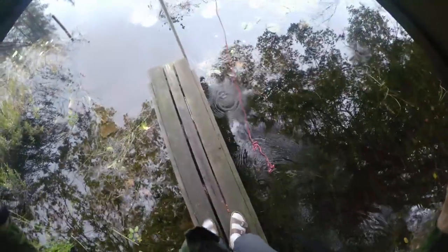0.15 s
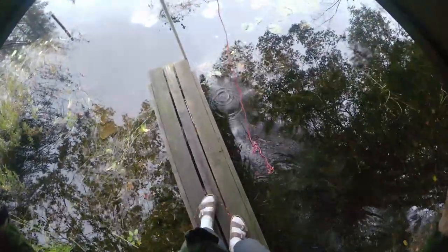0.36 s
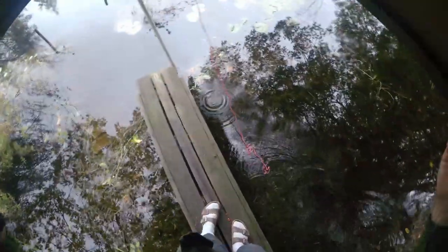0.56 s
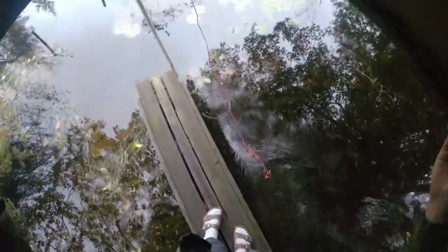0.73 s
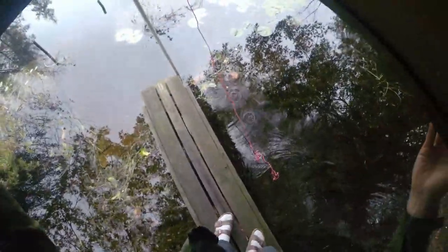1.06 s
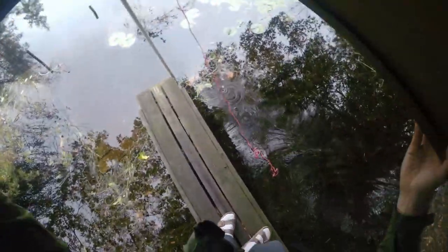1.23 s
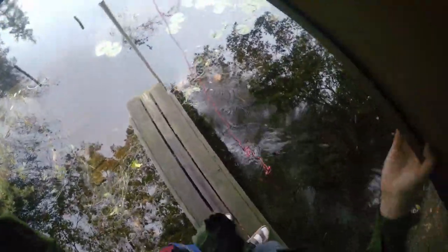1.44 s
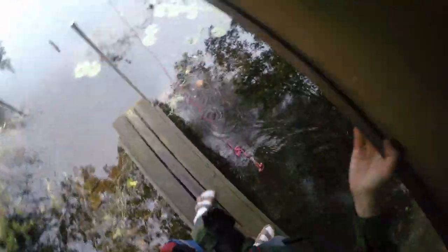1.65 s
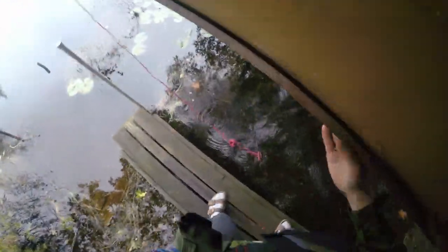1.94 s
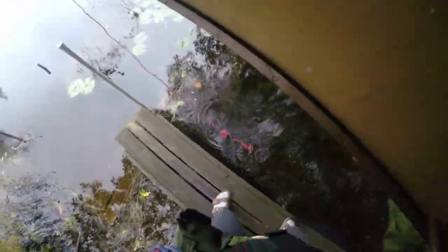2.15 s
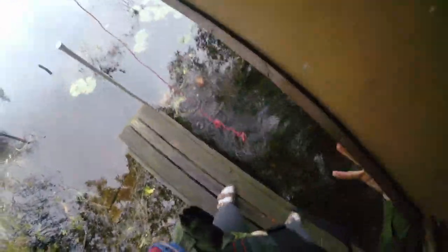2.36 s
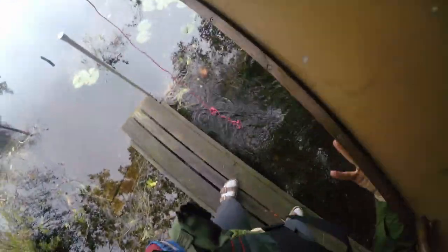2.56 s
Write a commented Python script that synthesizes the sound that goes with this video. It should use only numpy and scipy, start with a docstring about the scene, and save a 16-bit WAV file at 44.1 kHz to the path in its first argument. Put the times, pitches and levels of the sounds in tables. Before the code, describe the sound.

A canoe hull dragged and bumped by hand, with hollow knocks, short rubbing groans and deep thumps

```python
"""An upturned canoe is shifted by hand, over a low rumble, a cloth hiss and a faint air noise.
The hull drags throughout and small fittings tick; both are filtered or modal noise.
From 0.4 s slips give snaps with hollow tones; near 0.6 s the lowest hull mode starts to sing.
At 1 s one sharp rap with a clatter leads into soft thumps that ring the hull modes and panels.
Scuffs (shaped grit) and groans (jittered harmonics) follow from 1.3 s; the deepest thumps come after 2 s."""
import sys
import numpy as np
from scipy import signal
from scipy.io import wavfile
from scipy.ndimage import uniform_filter1d

SR = 44100
rng = np.random.default_rng(int(sys.argv[2]) if len(sys.argv) > 2 else 0)


def transcribe(u):
    """Save the signal u as a 16-bit wav file named by the first command-line argument.

    u: samples, shape (n,) or (channels, n), limited to [-1, 1]; the rate is SR.
    q: integer samples, one column per channel.
    """
    v = np.clip(np.atleast_2d(u).T, -1, 1)
    q = np.round(v * 32767).astype(np.int16)
    wavfile.write(sys.argv[1], SR, q)


N = 119070  # samples

# Colours are filter gains. Balance is left minus right. Event levels are relative within their table.
# air noise colour: (frequency [Hz], gain [dB])
AIR_COLOUR = [(265, -1), (450, -11.5), (900, -12), (5000, -24.5), (8000, -59), (14000, -39)]
# rumble course: (time [s], level [dB])
RUMBLE_COURSE = [(0, -28.5), (.17, -28), (.65, -25.5), (1.25, -24), (1.55, -21.5), (1.72, -17), (1.88, -17),
                 (2.001, -25), (2.13, -18), (2.53, -20.5), (2.7, -31.5)]
# rumble colour: (frequency [Hz], gain [dB])
RUMBLE_GAINS = [(18, -3.5), (31, 7), (42, -3.5), (75, -13), (130, -32), (300, -41), (800, -96)]
# sleeve hiss course: (time [s], level [dB])
SLEEVE_COURSE = [(.2, -53), (.7, -48), (1.15, -49), (1.4, -45), (1.65, -42.5), (1.9, -45), (2.05, -42.5),
                 (2.18, -43.5), (2.35, -46.5), (2.5, -51)]
# cloth colour, also the treble of the scuffs: (frequency [Hz], gain [dB])
CLOTH_COLOUR = [(200, -3.5), (800, 8.5), (3000, -1), (4800, -5), (6600, 3), (8500, -1), (12500, -16),
                (15000, -39)]
# hull modes: (frequency [Hz], level [dB], T60 [s])
HULL_MODES = [(104.05, 4.5, 0.43), (128, -0.5, 0.44), (163.5, -4, 0.58), (188, 5, 0.21), (237.9, 2, 0.17),
              (285, -14, 0.15), (400, -7, 0.34), (455, -2, 0.13), (535, -0.5, 0.19), (606, -14, 0.3),
              (793, -6, 0.25)]
# dense panel ringing: (frequency [Hz], gain [dB])
PANEL_COLOUR = [(40, -8), (100, 7.5), (160, 7), (280, 2.5), (720, -9), (1000, -24), (5000, -38)]
# hull drag course: (time [s], level [dB])
DRAG_COURSE = [(0, -41.5), (.55, -44.5), (.68, -29), (.9, -27.5), (1.25, -29), (1.48, -23), (1.57, -35.5),
               (1.9, -36.5), (2.08, -23), (2.2, -39), (2.48, -30.5), (2.58, -41)]
# friction force colour: (frequency [Hz], gain [dB])
FRICTION_COLOUR = [(50, 0.5), (110, 10), (200, -6.0), (400, -4.0), (1000, -11.0), (3000, -10)]
# hard ticks: (time [s], level [dB], balance [dB], ring frequency [Hz])
TICK_EVENTS = [(0.0189, -18.5, 1, 7150), (0.438, -30, -10, 8140), (0.4678, -35, -12, 7800),
               (1.414, -25, 6, 6700), (2.264, -21.5, 0, 6350)]
# tick colour: (multiple of ring frequency [1], gain [dB])
TICK_COLOUR = [(.15, -30), (.5, -12.5), (1, 7.5), (1.25, -2.5), (2, -30)]
# hull slips: (time [s], snap level [dB], hollow answer level [dB])
KNOCK_EVENTS = [(0.4362, -23, -28.5), (.467, -20.5, -21.5), (0.672, -28.5, -20.5), (0.725, -22.5, -16.5),
                (0.7612, -23, -17.5), (0.793, -24, -15), (0.8196, -23, -15.5), (0.8377, -25.5, -16),
                (0.8588, -23, -17), (0.8889, -28, -15.5), (.988, -34, -21.5), (1.976, -24.5, -33)]
# snap colour: (frequency [Hz], gain [dB])
SNAP_COLOUR = [(200, 4.5), (600, -0.5), (1750, -1.5), (2100, -9.5), (4200, -18), (8000, -19), (13000, -48)]
# hollow answer tones: (frequency [Hz], level [dB], balance [dB])
ANSWER_TONES = [(376, -10.5, 11), (455, -2, 8), (609, -7.5, -3.5), (736, -11.5, 8), (897, -9.5, 0.5),
                (1016, -16.5, 4), (1176, -14, -1), (1666, -21, -9.5)]
# hull singing course, silent outside it: (time [s], level [dB])
HUM_COURSE = [(.62, -42), (.8, -30), (1.05, -30), (1.2, -44)]
# rap colour: (frequency [Hz], gain [dB])
RAP_COLOUR = [(200, 12.5), (750, 0.5), (1100, 5), (2400, -2), (5000, -28.5), (8300, -12), (13000, -47)]
# soft blows: (time [s], level [dB], contact corner [Hz], swell time constant [s])
THUMP_EVENTS = [(1.044, -9, 131, 0.0028), (1.674, -14, 327, .004), (2.058, -3, 91, 0.018),
                (2.247, -2, 685, 0.0013), (2.254, -3, 442, 0.0011), (2.266, 4, 173, 0.0019),
                (2.283, -2.5, 184, 0.006), (2.319, 1.5, 109, 0.014), (2.397, -10, 89, 0.058)]
# scuffs: (time [s], rise [s], decay time constant [s], body level [dB], treble level [dB])
SCUFF_EVENTS = [(1.263, 0.038, 0.022, -27, -39), (1.444, 0.013, 0.022, -51, -38.5),
                (1.664, 0.013, 0.012, -67, -39.5), (1.99, 0.02, 0.079, -34.5, -43.5),
                (2.06, 0.015, 0.015, -30.5, -54), (2.25, 0.008, 0.024, -32, -39.5),
                (2.326, 0.016, 0.013, -72, -40.5), (2.646, 0.0019, 0.014, -65, -38.5)]
# scuff body and clatter colour: (frequency [Hz], gain [dB])
SCUFF_COLOUR = [(120, 0), (500, 4.5), (1000, -10.5), (2500, -15), (4500, -26), (9000, -40)]
# stick-slip groans: (start [s], length [s], level [dB], mean pitch [Hz])
GROAN_EVENTS = [(1.268, 0.09, -39.5, 569), (1.275, 0.076, -40, 429.5), (1.335, 0.054, -38.5, 477),
                (1.386, 0.16, -40, 455), (1.555, 0.069, -37, 241.3)]
# treble balance of the microphone ports: (frequency [Hz], balance [dB])
PORT_BALANCE = [(2500, -1.5), (6300, 3), (9500, -6), (12000, 0)]

AIR_DB = -47
ANSWER_PEAK_S, ANSWER_TAIL_DB, ANSWER_T60_S = 0.0088, -17, 0.35
RAP_S, RAP_DB, RAP_DECAY_S = 1.041, -23, 0.005
CLATTER_DB, CLATTER_HOLD_S, CLATTER_DECAY_S = -29.5, 0.024, 0.01
THUMP_T60_S, THUMP_RING_DB = 0.15, -4
EDGE_HZ = 14800


def amp(db):
    """Converts dB to an amplitude factor."""
    return 10 ** (np.asarray(db) / 20)


def unit(x):
    """Scales to rms 1."""
    return x / np.sqrt(np.mean(x ** 2) + 1e-20)


def blow(x):
    """Scales to the energy of 10 ms at rms 1."""
    return x / np.sqrt(np.mean(x ** 2) * x.shape[-1] / SR * 100 + 1e-20)


def add(mix, start_s, sound):
    """Adds a sound to the mix in place, cut at the end."""
    part = mix[:, max(round(start_s * SR), 0):][:, :sound.shape[1]]
    part += sound[:, :part.shape[1]]


def pan(balance_db):
    """Gives left and right gains; positive is heavier on the left."""
    return amp([[balance_db / 2], [-balance_db / 2]])


def course(points):
    """Interpolates a (time [s], level [dB]) table in dB, end values held, into a gain."""
    return amp(np.interp(np.arange(N) / SR, *np.transpose(points)))


def noise(n, correlation):
    """Two channels of white noise with the given correlation."""
    a, b = rng.standard_normal((2, n))
    c = np.clip(correlation, -1, 1)
    return np.array([a, c * a + np.sqrt(1 - c * c) * b])


def colour(x, points, size=8192):
    """Minimum-phase filter through (frequency [Hz], gain [dB]) points."""
    f, db = np.transpose(points)
    hz = abs(np.fft.fftfreq(size, 1 / SR))
    log_gain = np.log(amp(np.interp(np.log(hz + 1), np.log(f + 1), db)))
    spectrum = np.exp(np.conj(signal.hilbert(log_gain)))
    taps = np.fft.ifft(spectrum).real[:size // 2]
    return signal.fftconvolve(x, taps[None], axes=1)[:, :x.shape[1]]


def grain(n, rate_hz, depth_db):
    """A randomly flickering gain."""
    knots = rng.standard_normal(n)
    return amp(depth_db * np.interp(np.arange(n) * rate_hz / SR, np.arange(n), knots))


def steady(x, window_s):
    """Evens out the swells of a noise by its twice-smoothed power."""
    size = int(window_s * SR)
    power = uniform_filter1d((x ** 2).mean(0), size=size)
    return x / np.sqrt(abs(uniform_filter1d(power, size=size)) + 1e-20)


def ring(force):
    """Rings the hull modes, decaying sines, with a force."""
    t = np.arange(SR // 2) / SR
    modes = sum(amp(db - 60 * t / t60) * np.sin(2 * np.pi * hz * t) for hz, db, t60 in HULL_MODES)
    return signal.fftconvolve(force, modes[None], axes=1)[:, :force.shape[1]]


def air():
    """Constant faint coloured noise."""
    return amp(AIR_DB) * unit(colour(noise(N, 0.15), AIR_COLOUR))


def rumble():
    """Lumpy air and handling rumble: low noise, heavier on the right."""
    lumps = colour(noise(N + SR, 0.8), RUMBLE_GAINS)
    lumps = steady(lumps, window_s=0.22)[:, SR:]  # drops the filter's run-in
    return course(RUMBLE_COURSE) * lumps * pan(-9)


def sleeve():
    """Cloth hiss: noise with fast and slow grain, rising and falling along its course."""
    fibres = noise(N, -0.19) * grain(N, rate_hz=1700, depth_db=1.0) * grain(N, rate_hz=39, depth_db=2.5)
    return course(SLEEVE_COURSE) * unit(colour(fibres, CLOTH_COLOUR))


def drag(panel_db=-4):
    """Friction noise keeps the hull modes and panels droning."""
    force = colour(noise(N, 0.93), FRICTION_COLOUR)
    drone = unit(ring(force)) + amp(panel_db) * unit(colour(force, PANEL_COLOUR))
    return course(DRAG_COURSE) * steady(drone, window_s=0.08) * pan(5.2)


def ticks(tick_s=0.00071, tail_db=-21, tail_s=0.019, level_db=-20):
    """Fittings click: noise bursts with a weak tail, filtered around a ring frequency."""
    out, t = np.zeros((2, N)), np.arange(SR // 20) / SR
    for start_s, db, balance_db, ring_hz in TICK_EVENTS:
        env = np.exp(-t / tick_s) + amp(tail_db) * np.exp(-t / tail_s)
        click = colour(noise(len(t), 0.51) * env, [(k * ring_hz, gain) for k, gain in TICK_COLOUR])
        add(out, start_s, amp(db + level_db) * blow(click) * pan(balance_db))
    return out


def knocks(snap_db=-17, answer_db=-14.0, grit_db=-1, port_lag_s=0.00026):
    """Each slip snaps at the rim; the same hollow hull tones swell up a moment later."""
    out, t = np.zeros((2, N)), np.arange(SR // 3) / SR
    u = t / ANSWER_PEAK_S
    swell = (u * np.exp(1 - u)) ** 3
    tail = np.minimum(u, 1) * amp(ANSWER_TAIL_DB - 60 * t / ANSWER_T60_S)
    at_ports = t - np.array([[port_lag_s], [0]])  # left lags
    phases = rng.uniform(0, 2 * np.pi, len(ANSWER_TONES))
    for start_s, snap, answer in KNOCK_EVENTS:
        impulse = (t == 0)[None] * 1.0
        grit = noise(len(t), 0.24) * np.exp(-t / 0.0032)
        slip = blow(impulse) + amp(grit_db) * blow(grit)
        add(out, start_s, amp(snap + snap_db) * blow(colour(slip, SNAP_COLOUR)) * pan(-7))
        tones = np.zeros((2, len(t)))
        drifted = rng.normal(phases, 0.49)
        for (hz, db, balance_db), phase in zip(ANSWER_TONES, drifted):
            tones += amp(db) * pan(balance_db) * np.sin(2 * np.pi * hz * at_ports + phase)
        add(out, start_s, amp(answer + answer_db) * blow(tones * (swell + tail)))
    return out


def hum():
    """The sliding hull sings faintly on its lowest mode, pitch and level wavering."""
    level = amp(np.interp(np.arange(N) / SR, *np.transpose(HUM_COURSE), left=-np.inf, right=-np.inf))
    hz = HULL_MODES[0][0] * grain(N, rate_hz=29.6, depth_db=-0.22)
    tone = np.sin(2 * np.pi * np.cumsum(hz) / SR) * grain(N, rate_hz=34.0, depth_db=2.5)
    return level * unit(tone) * pan(1.2)


def rap():
    """The hull fetches up with one decaying noise crack; the skin clatters briefly with it and after."""
    out, t = np.zeros((2, N)), np.arange(SR // 8) / SR
    crack = colour(noise(len(t), 0.13) * np.exp(-t / RAP_DECAY_S), RAP_COLOUR)
    held = np.exp(-np.maximum(t - CLATTER_HOLD_S, 0) / CLATTER_DECAY_S)
    clatter = colour(noise(len(t), 0.5) * held, SCUFF_COLOUR)
    add(out, RAP_S, amp(RAP_DB) * blow(crack) * pan(0.5) + amp(CLATTER_DB) * blow(clatter))
    return out


def thumps(panel_db=-1, level_db=-11):
    """Soft pushes flex the skin and set the low modes and the panels booming."""
    out, t = np.zeros((2, N)), np.arange(SR // 2) / SR
    decay = np.exp(-np.log(1000) * t / THUMP_T60_S)
    for start_s, db, corner_hz, swell_s in THUMP_EVENTS:
        u = 2 * np.pi * corner_hz * t
        push = (u * np.exp(-u))[None]
        rise = 1 - np.exp(-t / swell_s)
        dense = signal.fftconvolve(noise(2 * len(t), 0.97), colour(push, PANEL_COLOUR), "valid", axes=1)
        panels = steady(dense[:, :len(t)], window_s=0.012) * rise * decay
        boom = amp(THUMP_RING_DB) * blow(ring(push) * rise) + amp(panel_db) * blow(panels)
        add(out, start_s, amp(db) * boom)
    return out * amp(level_db) * pan(4.7)


def scuffs():
    """Brushes against the hull: flickering noise that swells and dies away."""
    out, t = np.zeros((2, N)), np.arange(SR // 3) / SR
    for start_s, rise_s, decay_s, body_db, treble_db in SCUFF_EVENTS:
        env = np.minimum(t / rise_s, 1) ** 1.3 * np.exp(-np.maximum(t - rise_s, 0) / decay_s)
        grit = noise(len(t), 0.2) * grain(len(t), rate_hz=1500, depth_db=2.5)
        body = amp(body_db) * unit(colour(grit, SCUFF_COLOUR))
        treble = amp(treble_db) * unit(colour(grit, CLOTH_COLOUR))
        add(out, start_s, env * (body + treble))
    return out


def groans(jitter=0.056, overtone_db=-16):
    """Quick uneven slips give a rough, nearly pitched rub: four harmonics of a jittered pitch."""
    out = np.zeros((2, N))
    for start_s, length_s, db, pitch_hz in GROAN_EVENTS:
        n = int(length_s * SR)
        wander = unit(uniform_filter1d(rng.standard_normal(n), size=14))
        phase = 2 * np.pi * np.cumsum(pitch_hz * (1 + jitter * wander)) / SR
        # overtone_db is per octave
        tone = sum(amp(overtone_db * np.log2(k)) * np.sin(k * phase) for k in range(1, 5))
        env = np.sqrt(abs(np.sin(np.linspace(0, np.pi, n)))) * grain(n, rate_hz=160, depth_db=3)
        add(out, start_s, amp(db) * unit(tone * env) * pan(8.9))
    return out


def scene():
    """Sums all layers."""
    beds = air() + rumble() + sleeve() + drag()
    return beds + ticks() + knocks() + hum() + rap() + thumps() + scuffs() + groans()


def record(dry):
    """The two microphone ports colour the treble differently; then the band limit."""
    left = colour(dry[:1], [(hz, db / 2) for hz, db in PORT_BALANCE])
    right = colour(dry[1:], [(hz, -db / 2) for hz, db in PORT_BALANCE])
    lowpass = signal.firwin(511, EDGE_HZ, window=("kaiser", 9), fs=SR)
    return signal.oaconvolve(np.vstack([left, right]), lowpass[None], "same")


dry = scene()
out = record(dry)
transcribe(out)
```